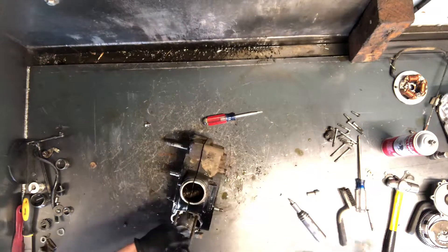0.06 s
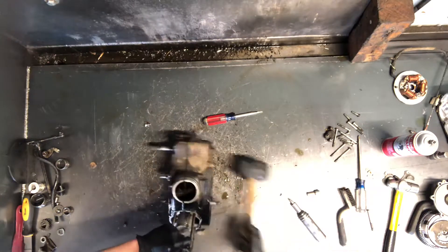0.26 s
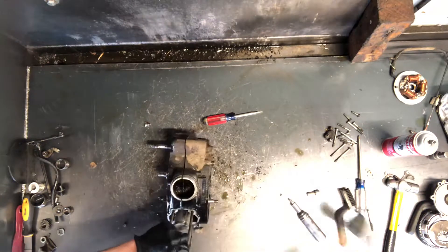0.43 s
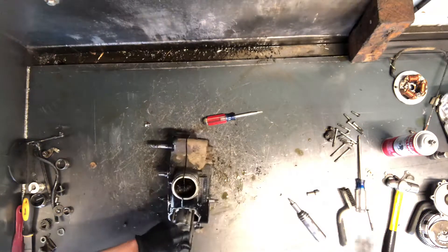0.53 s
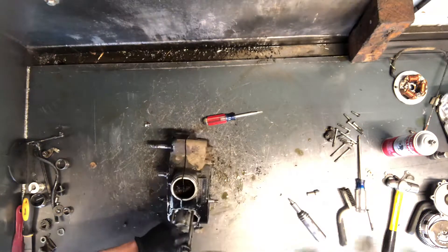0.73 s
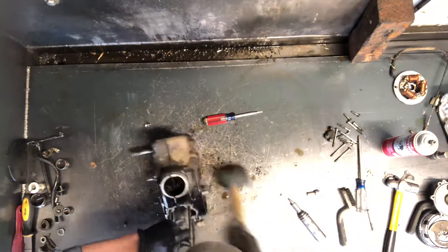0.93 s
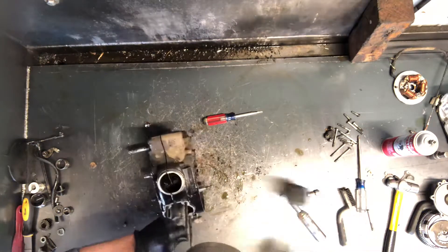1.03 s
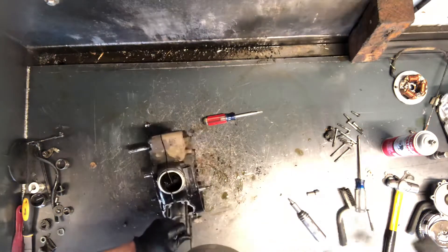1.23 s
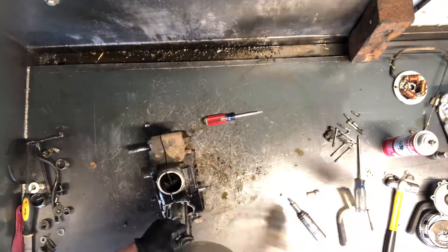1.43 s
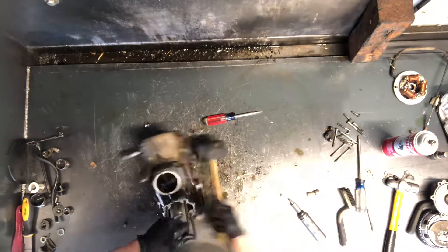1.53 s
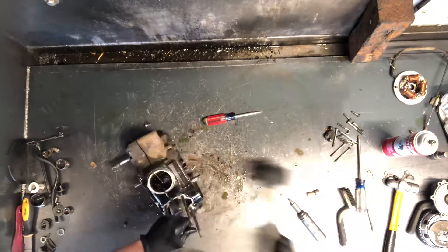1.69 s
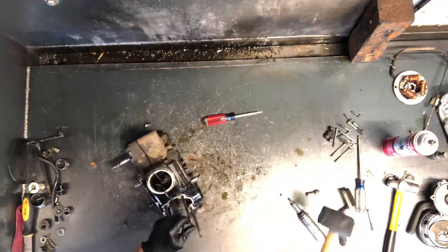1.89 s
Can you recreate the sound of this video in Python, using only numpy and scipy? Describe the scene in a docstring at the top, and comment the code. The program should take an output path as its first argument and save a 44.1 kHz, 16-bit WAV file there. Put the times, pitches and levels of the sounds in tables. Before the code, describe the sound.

A mallet hits a hand-held engine casing three times, loudest first; each hard metallic clack is followed by a thump and rattle on the steel bench, with ringing echo in a bare garage, heard close up.

```python
"""A mallet strikes a hand-held engine casing three times on a steel workbench, close to the microphone.
Each blow is a hard clack of cast metal: two noise bursts plus quickly damped sine modes, led by a faint burr.
A moment later the jolted casing thumps (low noise and a sine) and chatters (bright noise) on the bench;
slower sines ring on and the bare garage answers with decaying noise. The first jolt also sets off a high tinkle.
The casing slides at the start, with faint ticks and scuffs during and after it: shaped noise over still air."""
import sys
import numpy as np
from scipy import signal
from scipy.fft import rfft, irfft
from scipy.io import wavfile
from scipy.ndimage import uniform_filter1d, minimum_filter1d

SR = 44100
rng = np.random.default_rng(int(sys.argv[2]) if len(sys.argv) > 2 else 0)


def unload_wav(signal):
    """Save mono or channel-first audio to the path in sys.argv[1] as 16-bit WAV at rate SR, clipped to [-1, 1]."""
    wavfile.write(
        sys.argv[1],
        SR,
        np.round(np.clip(np.atleast_2d(signal).T, -1, 1) * 32767).astype(np.int16),
    )


N = 85995  # length in samples


def amp(db):
    """Decibels to gain."""
    return 10 ** (np.asarray(db) / 20)


def read(points, hz, axis=1):
    """Reads one column of a table on a log-frequency axis."""
    table = np.array(points, float)
    return np.interp(np.log(hz + 1), np.log(table[:, 0] + 1), table[:, axis])


def add(mix, s, sound):
    """Mixes a sound in at a time in seconds, cut off at the end of the mix."""
    part = mix[max(round(s * SR), 0):][:len(sound)]
    part += sound[:len(part)]


def noise(spectrum, tilt_db=0):
    """Noise of rms 1 whose spectrum follows a table, tilted in dB per octave."""
    hz = np.fft.rfftfreq(N, 1 / SR)
    gain = amp(read(spectrum, hz) + tilt_db * np.log2(hz + 20))  # +20 Hz keeps the log finite at DC
    x = irfft(rfft(rng.standard_normal(N)) * gain, N)
    return x / x.std()


def envelope(rise, hold, t60):
    """Linear attack, hold, then exponential release by 60 dB per t60; all in seconds."""
    t = np.arange(N) / SR
    attack = np.minimum(t / rise, 1)
    return attack * amp(-60 * np.maximum(t - rise - hold, 0) / t60)


def modes(table, spot, rise):
    """Dying sines at random phases, weighted by the spot that is struck."""
    t = np.arange(N) / SR
    out = np.zeros(N)
    for hz, t60, *db in table:
        sine = np.sin(2 * np.pi * (hz * t + rng.random()))
        out += amp(db[spot]) * envelope(rise, 0, t60) * sine
    return out


# spectrum of still air: f/Hz, relative level/dB per Hz
AIR_SPECTRUM = [(20, -44), (35, -23), (48, -20.5), (65, -3.5), (100, 2), (160, -21), (300, -23),
                (700, -15.5), (2000, -20), (5000, -28.5), (9000, -39.5), (16000, -61.5)]
AIR_DB = -60.5


def still_air():
    """Steady, faint shaped noise: the air of the room."""
    return amp(AIR_DB) * noise(AIR_SPECTRUM)


# spectrum of the casing sliding on the bench: f/Hz, relative level/dB per Hz
SLIDE_SPECTRUM = [(30, -34), (100, 8), (200, -4), (400, -4.5), (950, -6.5), (1800, -16), (3600, -14.5),
                  (6000, -30.5), (15000, -35.5)]
SLIDE_DB, SLIDE_HOLD_S, SLIDE_T60_S = -48.5, 0.086, 0.51
SLIDE_RING_DB = -33.5
# small ticks and scuffs of the casing as it is held: t/s, level/dB, rise/s, t60/s
SCUFF_EVENTS = [(0.0, -50, 0.0017, 0.61), (0.068, -50.5, 0.031, 0.17), (0.518, -50, .01, 0.17),
                (0.695, -51.5, .008, 0.24), (1.791, -39.5, 0.0011, 0.19)]
# spectrum of each scuff: f/Hz, relative level/dB per Hz
SCUFF_SPECTRUM = [(60, -6.5), (400, 5), (1000, -0.5), (2000, -13.5), (3700, 1), (5000, -6.5), (7500, -11),
                  (9000, -17), (15000, -25.5)]


def handling():
    """The casing slides, faintly ringing; small ticks and scuffs come during and after the slide."""
    out = amp(SLIDE_DB) * noise(SLIDE_SPECTRUM) * envelope(.002, SLIDE_HOLD_S, SLIDE_T60_S)
    out += amp(SLIDE_RING_DB) * modes(RING_MODES, 2, RING_RISE_S)  # weighted as in the third blow
    for s, db, rise, t60 in SCUFF_EVENTS:
        add(out, s, amp(db) * noise(SCUFF_SPECTRUM) * envelope(rise, 0, t60))
    return out


# burr ahead of each blow: level/dB for blow 1, 2, 3
LEAD_LEVELS = [-40.5, -35, -47.5]
LEAD_S = .022


def lead(spot):
    """A faint burr just ahead of the clack: the clack's noise with its treble tilted down."""
    burr = noise(CLASH_SPECTRUM, tilt_db=-2.4) * envelope(.0015, LEAD_S, .02)
    return amp(LEAD_LEVELS[spot]) * burr


# dense upper modes of the cast metal, also heard in burr and chatter: f/Hz, relative level/dB per Hz
CLASH_SPECTRUM = [(20, -65), (120, -46.5), (300, -4.5), (500, -10), (750, 2), (1300, -1.5), (1800, -4),
                  (2600, -3.5), (3800, -1.5), (5200, -12), (7600, -16.5), (8600, -22), (10500, -26.5),
                  (16000, -35)]
CLASH_DB, CLASH_RISE_S, CLASH_HOLD_S, CLASH_T60_S = -8.5, 0.00059, 0.0035, 0.028
# spectrum of the first instant of contact: f/Hz, relative level/dB per Hz
CRACK_SPECTRUM = [(20, -77), (300, -39.5), (1500, 3.5), (3500, 0), (7500, -1.5), (9000, -9), (16000, -23)]
CRACK_DB, CRACK_T60_S = -10.5, 0.019
# quickly damped casing modes; each blow lands on another spot: f/Hz, t60/s, relative level/dB in blow 1, 2, 3
CASING_MODES = [(650, .05, -20, -24, -27), (735, .06, -11, -22, -24), (780, .06, -14, -15, -20),
                (880, .05, -14, -15, -12), (950, .045, -13, -18, -14), (1245, .06, -21, -22, -18),
                (1480, .04, -15, -13, -17), (1850, .04, -20, -19, -34), (2135, .07, -30, -26, -14),
                (2310, .07, -23, -14, -25), (3000, .04, -30, -12, -18), (3530, .06, -22, -21, -21),
                (3720, .07, -22, -18, -19), (3900, .06, -22, -25, -27)]
CASING_DB = 3.36
CLACK_LOW_HZ = 430


def clack(spot, bright_db):
    """The blow itself: a crack, a dense clash and the casing's strong modes; too small a body to radiate bass."""
    clash = noise(CLASH_SPECTRUM, bright_db) * envelope(CLASH_RISE_S, CLASH_HOLD_S, CLASH_T60_S)
    crack = noise(CRACK_SPECTRUM, bright_db) * envelope(CLASH_RISE_S, 0, CRACK_T60_S)
    casing = modes(CASING_MODES, spot, CLASH_RISE_S)
    blow = amp(CLASH_DB) * clash + amp(CRACK_DB) * crack + amp(CASING_DB) * casing
    highpass = signal.butter(2, CLACK_LOW_HZ, "high", fs=SR, output="sos")
    return signal.sosfilt(highpass, blow)


# lasting ring of casing and bench: f/Hz, t60/s, relative level/dB in blow 1, 2, 3
RING_MODES = [(102, .7, -40, -42, -34), (689, .65, -27, -29, -31), (716, .68, -18, -24, -33),
              (745, .6, -32, -28, -30), (779, .66, -21, -28, -30), (813, .7, -38, -38, -27),
              (852, .6, -26, -34, -30), (881, .6, -29, -32, -38), (1238, .75, -33, -43, -30),
              (2303, .8, -42, -38, -44), (3585, .7, -38, -41, -30), (3630, .7, -29, -37, -42),
              (3722, .7, -35, -33, -37)]
RING_DB, RING_RISE_S = -1, 0.047


def ring(spot):
    """Casing and bench ring on: slowly dying sines that swell in behind the clack."""
    return amp(RING_DB) * modes(RING_MODES, spot, RING_RISE_S)


# the answer of bench and garage: f/Hz, t60/s, relative level/dB per Hz
GARAGE_DECAY = [(20, .7, -34.5), (45, 0.42, -32.5), (70.7, 0.78, -4), (108, 0.71, -6), (168, 0.71, -6.5),
                (315, 0.83, -6.5), (475, 0.69, -3.5), (549, 0.65, -1), (720, 0.77, 1.5), (930, .78, -4),
                (1380, 0.9, -7), (1700, 0.86, -15), (2210, 0.9, -9.5), (2920, 0.88, -12.5),
                (3516, 0.89, -9), (3585, 0.84, -6), (4240, 0.77, -13), (5590, 0.64, -15.5),
                (7970, 0.51, -21.5), (8200, 0.47, -25.5), (11000, 0.38, -30), (16000, .3, -37.5)]
ROOM_DB, ROOM_DELAY_S, ROOM_BUILD_S = -14.5, 0.0059, 0.021
GRAIN_DB = 3  # random unevenness between frequency bins, full from 1600 Hz up
BASS_HZ, BASS_START = 520, 0.17  # crossover; start of the bass swell as a fraction of the jolt delay


def garage(bright_db, jolt_s):
    """Dense ringing of bench and room builds up and dies, highest treble fastest; bass swells until the jolt."""
    hz, frame_s, bins = signal.stft(rng.standard_normal(N), SR, nperseg=1024)
    uneven_db = GRAIN_DB * rng.standard_normal(len(hz)) * np.minimum(hz / 1600, 1)
    colour = amp(read(GARAGE_DECAY, hz, axis=2) + bright_db * np.log2(hz + 20) + uneven_db)
    colour /= np.sqrt(np.mean(colour ** 2))
    decay = amp(-60 * frame_s / read(GARAGE_DECAY, hz)[:, None])
    bins = bins * colour[:, None] * decay
    low = 1 / (1 + (hz[:, None] / BASS_HZ) ** 8)
    bass, treble = signal.istft(np.array([bins * low, bins * (1 - low)]), SR)[1][:, :N]
    t = np.arange(N) / SR
    treble_build = np.clip((t - ROOM_DELAY_S) / ROOM_BUILD_S, 0, 1)
    bass_swell = np.clip((t / jolt_s - BASS_START) / (1 - BASS_START), 0, 1)
    return amp(ROOM_DB) * (treble * treble_build + bass * bass_swell)


# spectrum of the casing landing on the bench: f/Hz, relative level/dB per Hz
THUMP_SPECTRUM = [(25, -32), (45, -24.5), (70, -18.5), (105, 5.5), (170, -3.5), (300, -9.5), (520, -3),
                  (900, -15), (2500, -36)]
THUMP_DB, THUMP_RISE_S, THUMP_HOLD_S, THUMP_T60_S = -23.5, 0.00623, 0.0097, 0.29


def thump():
    """The bench top takes the weight of the jolt: a low noise burst."""
    return amp(THUMP_DB) * noise(THUMP_SPECTRUM) * envelope(THUMP_RISE_S, THUMP_HOLD_S, THUMP_T60_S)


BOOM_HZ, BOOM_DB, BOOM_T60_S = 96.3, -24, .13


def boom():
    """The bench top flexes at its lowest mode: one dying sine."""
    sine = np.sin(2 * np.pi * BOOM_HZ * np.arange(N) / SR)
    return amp(BOOM_DB) * sine * envelope(THUMP_RISE_S, 0, BOOM_T60_S)


CHATTER_DB, CHATTER_RISE_S, CHATTER_HOLD_S, CHATTER_T60_S = -22, 0.0035, 0.0027, 0.056


def chatter():
    """Metal meets metal as the casing lands: a short burst of the clash noise, tilted brighter."""
    burst = noise(CLASH_SPECTRUM, tilt_db=2.1)
    return amp(CHATTER_DB) * burst * envelope(CHATTER_RISE_S, CHATTER_HOLD_S, CHATTER_T60_S)


# pitches of a small loose steel part: f/Hz
TINKLE_PITCHES = [14060, 14850]
TINKLE_DB, TINKLE_T60_S = -43, .13


def tinkle():
    """A small loose steel part is shaken by the hardest jolt and pings very high."""
    t = np.arange(N) / SR
    pings = sum(np.sin(2 * np.pi * hz * t) for hz in TINKLE_PITCHES)
    return amp(TINKLE_DB) * pings * envelope(.003, .008, TINKLE_T60_S)


# the blows, levels relative to each layer's own: t/s, clack level/dB, clack brightness/dB per octave,
# jolt delay/s, thump level/dB, boom level/dB, chatter level/dB, room level/dB, room brightness/dB per octave
BLOW_EVENTS = [(0.2378, 5.5, -1.5, 0.027, 4, -2.5, 6, 1.5, -0.57),
               (0.8850, -1, 0.2, 0.036, -3.5, -6, 2.5, -2.5, 0),
               (1.5458, -7, -0.7, 0.026, -11, 5, 3, -1.5, 0.32)]


def scene():
    """Three blows with their jolts and echoes, over handling and still air."""
    out = still_air() + handling()
    for spot, blow in enumerate(BLOW_EVENTS):
        s, clack_db, bright_db, jolt_s, thump_db, boom_db, chatter_db, room_db, room_bright_db = blow
        add(out, s - LEAD_S, lead(spot))
        add(out, s, amp(clack_db) * clack(spot, bright_db) + ring(spot))
        add(out, s, amp(room_db) * garage(room_bright_db, jolt_s))
        # thump and boom start early so that their attack ends at the jolt
        add(out, s + jolt_s - THUMP_RISE_S, amp(thump_db) * thump() + amp(boom_db) * boom())
        add(out, s + jolt_s, amp(chatter_db) * chatter())
    first_s, first_jolt_s = BLOW_EVENTS[0][0], BLOW_EVENTS[0][3]
    add(out, first_s + first_jolt_s, tinkle())
    return out[None]


LIMIT, LIMIT_S = 1, 0.0006  # peak ceiling as amplitude, limiter window
EDGE_HZ = 15780  # top of the band


def record(dry):
    """A fast limiter holds down the loudest peaks; then a steep lowpass limits the band."""
    size = int(LIMIT_S * SR)
    needed_gain = LIMIT / np.maximum(abs(dry), LIMIT)
    gain = uniform_filter1d(minimum_filter1d(needed_gain, size), size)
    lowpass = signal.firwin(511, EDGE_HZ, window=("kaiser", 9), fs=SR)
    return signal.oaconvolve(dry * gain, lowpass[None], "same")


dry = scene()
out = record(dry)
unload_wav(out)
```